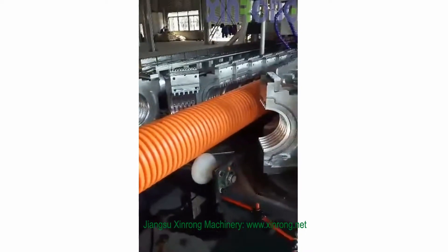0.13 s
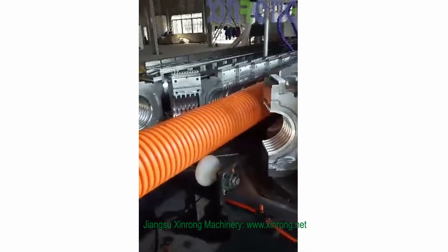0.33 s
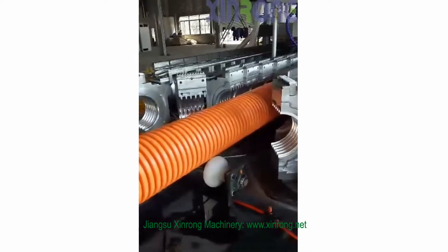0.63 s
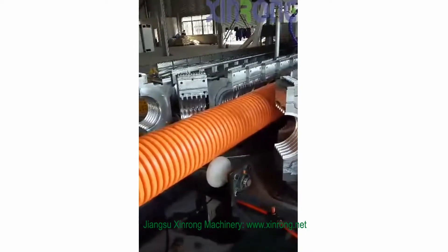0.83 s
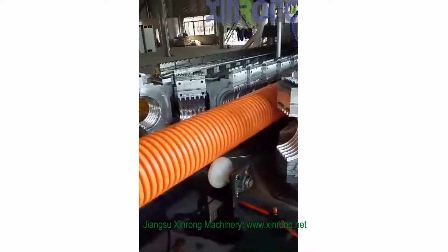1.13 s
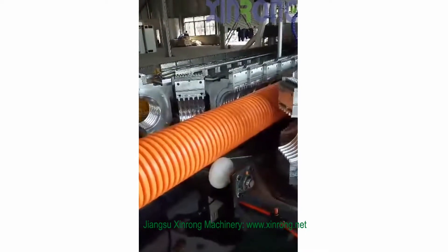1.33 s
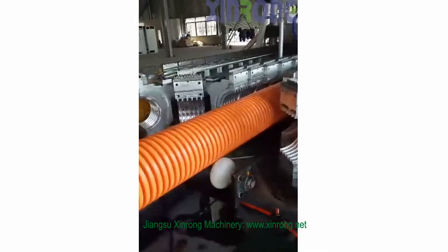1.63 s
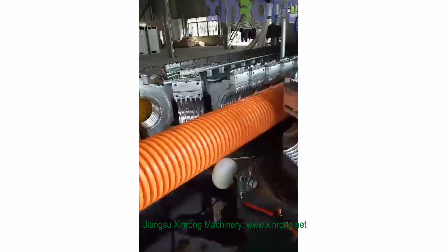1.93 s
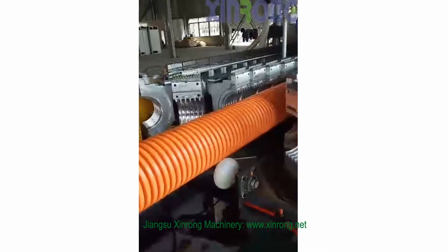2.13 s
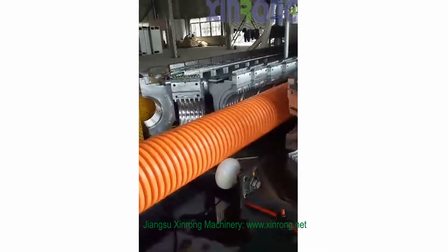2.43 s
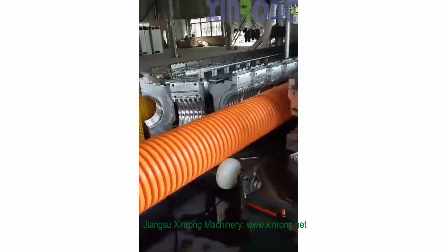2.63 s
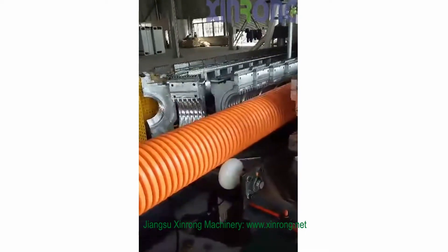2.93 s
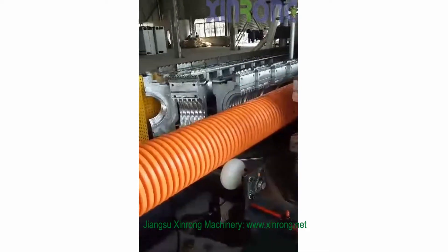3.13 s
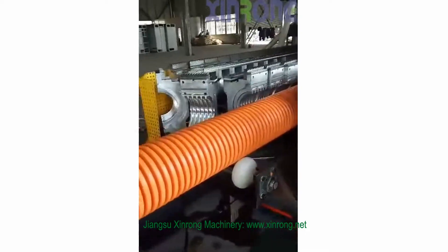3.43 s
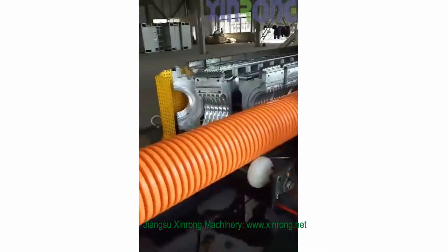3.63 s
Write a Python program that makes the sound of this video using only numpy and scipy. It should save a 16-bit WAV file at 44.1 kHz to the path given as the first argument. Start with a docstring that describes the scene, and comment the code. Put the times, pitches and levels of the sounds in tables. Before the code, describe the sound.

A running production line hums and roars with fans, motors and rushing air.

```python
"""A large factory hall, a stereo pair of microphones close to a running corrugated-pipe extrusion line.
A blower hums at its blade rate, motors and drives add beating tones, mould blocks rub along their rails,
cooling air hisses, and fan roar fills the hall behind. Near the end the mould chain gives a soft clunk
and rumbles louder. Twice the signal cuts out for an instant."""
import sys
import numpy as np
from scipy import signal
from scipy.fft import rfft, irfft
from scipy.io import wavfile

SR = 44100
rng = np.random.default_rng(int(sys.argv[2]) if len(sys.argv) > 2 else 0)


def store_pcm(level_fs):
    """Save levels as 16-bit WAV."""
    pcm = np.round(np.clip(level_fs, -1, 1) * 32767).astype(np.int16)
    wavfile.write(sys.argv[1], SR, np.atleast_2d(pcm).T)


N = 167580


def undb(db):
    """Decibels to gain."""
    return 10 ** (np.asarray(db) / 20)


def level(x, db):
    """Scale to an rms level."""
    return x * undb(db) / np.sqrt(np.mean(x ** 2))


def curve(points):
    """Join (t/s, value) points by straight lines."""
    return np.interp(np.arange(N) / SR, *np.array(points).T)


def colour(x, points):
    """Filter by (f/Hz, gain/dB) points on a log-frequency axis."""
    hz, db = np.array(points).T
    bin_hz = np.arange(N // 2 + 1) * SR / N
    gain_db = np.interp(np.log(bin_hz + 1), np.log(hz), db)
    return irfft(rfft(x) * undb(gain_db), N)


def resonate(x, hz, width_hz):
    """A steep resonance: a band-pass applied twice."""
    b, a = signal.iirpeak(hz, hz / width_hz, fs=SR)
    return signal.lfilter(b, a, signal.lfilter(b, a, x))


def drift(rate_hz):
    """A smooth random wander of unit spread, mostly slower than rate_hz."""
    hz = np.arange(N // 2 + 1) * SR / N
    slow_band = (hz > 0) * np.exp(-(hz / rate_hz) ** 2)
    return level(irfft(rfft(rng.standard_normal(N)) * slow_band, N), 0)


def tone(hz, db, wow, flutter_db):
    """A machine tone, wavering in pitch by the fraction wow and in level by flutter_db."""
    cycles = np.cumsum(hz * (1 + wow * drift(2.9))) / SR + rng.random()
    return np.sqrt(2) * np.sin(2 * np.pi * cycles) * undb(db + flutter_db * drift(8.4))


def steel_echoes(x, span_s=(.002, .03), count=12):
    """Add early echoes from the machine's steel, which ripple the spectrum."""
    lags = (rng.uniform(*span_s, size=count) * SR).astype(int)
    signs = rng.choice([-1, 1], size=count)
    echoes = sum(sign * np.roll(x, lag) for sign, lag in zip(signs, lags))
    return level(x, 0) + level(echoes, db=-11)


def blower(blade_hz=246.03):
    """The dominant hum, at the blower's blade rate; its inflow makes it flutter."""
    # strength of the blade tone: t/s, level/dB
    blade_level = [(0, -26), (.5, -27.5), (1.1, -29), (1.7, -27.5), (2.3, -29.3), (2.65, -27.5),
                   (2.9, -27.5), (3.1, -25), (3.42, -25), (3.58, -29), (3.7, -23), (3.8, -30)]
    return tone(blade_hz, curve(blade_level), wow=0.00022, flutter_db=0.5)


def motors(mains_hz=50.02):
    """Magnetic mains hum and the whine of shafts and gears; close pairs beat."""
    # magnetic hum: multiple of the mains frequency, level/dB
    harmonics = [(6, -37.5), (12, -41), (18, -42), (24, -57.5), (30, -52.5), (48, -52.5), (54, -56.5),
                 (60, -59)]
    # tones of motors, pumps and gears: f/Hz, level/dB
    shaft_tones = [(24.4, -60), (75.8, -46.5), (174.4, -43), (392.4, -45.5), (450.6, -47), (492, -49.5),
                   (621.3, -42), (697, -52.5), (712, -48), (747.6, -47), (783.1, -41.5), (921.9, -51),
                   (929, -45), (1229.8, -47.5), (1368.4, -40.5), (2555.2, -49.5), (3019.8, -51.5)]
    hum = sum(tone(k * mains_hz, db, wow=0.0001, flutter_db=0.5) for k, db in harmonics)
    whine = sum(tone(hz, db, wow=0.00025, flutter_db=1.04) for hz, db in shaft_tones)
    return hum + whine


def mould_chain():
    """Sliding mould blocks shake the frame into a rumble, loudest near the end."""
    # body resonances of the chain: f/Hz, width/Hz, relative level/dB
    resonances = [(180, 45, -4.5), (334.6, 51, -0.5), (385, 84, 2), (486, 57, 0), (537, 46, -1.5),
                  (710, 160, -6.5), (1340, 420, -20)]
    # strength of the rumble: t/s, level/dB
    rumble_level = [(0, -46), (1.5, -42), (2.2, -36), (2.6, -41), (3.05, -35), (3.31, -33.5), (3.42, -30.5),
                    (3.6, -32), (3.74, -27.5), (3.8, -35)]
    rub = rng.standard_normal(N)
    rumble = sum(undb(db) * resonate(rub, hz, width) for hz, width, db in resonances)
    return level(rumble, 0) * undb(curve(rumble_level))


def clunk(start_s=3.331, attack_s=0.011, gain_db=-19):
    """A mould block closes softly: its modes ring briefly and the hall trails after."""
    # modes of the block: f/Hz, relative level/dB, t60/s
    modes = [(382, -9, 0.12), (464, -3, 0.11), (522, -1, .11), (1270, -12, .12)]
    age = np.maximum(np.arange(N) / SR - start_s, 0)
    rise = np.minimum(age / attack_s, 1)
    since_peak = np.maximum(age - attack_s, 0)

    def envelope(t60_s):
        return rise * undb(gain_db - 60 * since_peak / t60_s)

    ring = sum(undb(db) * np.sin(2 * np.pi * hz * age) * envelope(t60) for hz, db, t60 in modes)
    tail = sum(undb(db) * resonate(rng.standard_normal(N), hz, width_hz=150) for hz, db, _ in modes)
    return ring + level(tail, db=-9) * envelope(t60_s=0.42)


def cooling_air(surge_db=0.6):
    """Cooling air rushes out of the steel moulds, hissing and surging slightly."""
    # spectrum of the rushing air: f/Hz, relative level/dB
    spectrum = [(400, -17), (1400, -2.5), (2050, -1), (2600, -1.5), (3600, -5), (4600, -5), (6500, -7.5),
                (6800, -11), (7900, -21.5), (8600, -24.5), (9100, -23), (9700, -36), (10400, -49)]
    hiss = colour(steel_echoes(rng.standard_normal(N)), spectrum)
    return level(hiss, db=-33.5) * undb(surge_db * drift(11))


def rails(swell_db=1.5):
    """The metal blocks rub along their guide rails in uneven swells."""
    rub = resonate(steel_echoes(rng.standard_normal(N)), hz=2164, width_hz=1210)
    return level(rub, db=-40) * undb(swell_db * drift(20))


def hall_roar(throb_db=0.4):
    """The diffuse roar of fans and drives, smoothed by the big room; it throbs a little."""
    # spectrum of the roar: f/Hz, relative level/dB
    spectrum = [(20, -17), (42, -25), (62, -18), (76, -5), (100, -1), (200, 1.5), (270, 2), (340, -1.5),
                (400, -0.5), (560, -5), (750, -9), (950, -8.5), (1200, -9), (1450, -18), (2200, -14.5),
                (6000, -56)]
    roar = colour(rng.standard_normal(N), spectrum)
    return level(roar, db=-27.5) * undb(throb_db * drift(18))


def scene():
    """The line at two close microphones; only roar, air and rails differ between left and right."""
    # stereo width, side relative to mid: f/Hz, level/dB
    width = [(25, -10.5), (60, -21), (150, -49.5), (350, -45.5), (700, -32), (1400, -21.5), (2800, -20.5),
             (5600, -18.5), (7500, -14.5), (9000, -9)]
    mid = blower() + motors() + hall_roar() + cooling_air() + mould_chain() + clunk() + rails()
    side = colour(hall_roar() + cooling_air() + rails(), width)
    return np.array([mid + side, mid - side])


def record(dry):
    """The right microphone is a little brighter; two dropouts leave faint hiss; the top is cut."""
    # the signal skips ahead by gap_s and later drops out for as long: skip t/s, dropout t/s
    dropouts = [(.24, 1.2200), (2.22, 3.2040)]
    gap_s, edge_s, top_hz = .01333, .0001, 10100
    t = np.arange(N) / SR
    left = colour(dry[0], [(500, 0.058), (2500, -0.21), (8000, -.5)])
    right = colour(dry[1], [(500, 0), (2500, 0.046), (8000, .5)])
    # after a skip the signal runs early until the middle of its dropout
    ahead = sum((t > skip) & (t < start + gap_s / 2) for skip, start in dropouts)
    heard = np.array([left, right])[:, np.arange(N) + ahead * round(gap_s * SR)]
    gap = sum(np.tanh((t - start) / edge_s) - np.tanh((t - start - gap_s) / edge_s)
              for _, start in dropouts) / 2  # 1 inside a dropout, 0 elsewhere
    hiss = colour(rng.standard_normal(N), [(100, -8), (1000, -6), (6500, -11.5), (9000, -20)])
    lowpass = signal.ellip(8, .2, 80, top_hz, fs=SR, output="sos")
    return signal.sosfilt(lowpass, (1 - gap) * heard + gap * level(hiss, db=-47.5))


dry = scene()
out = record(dry)
store_pcm(out)
```